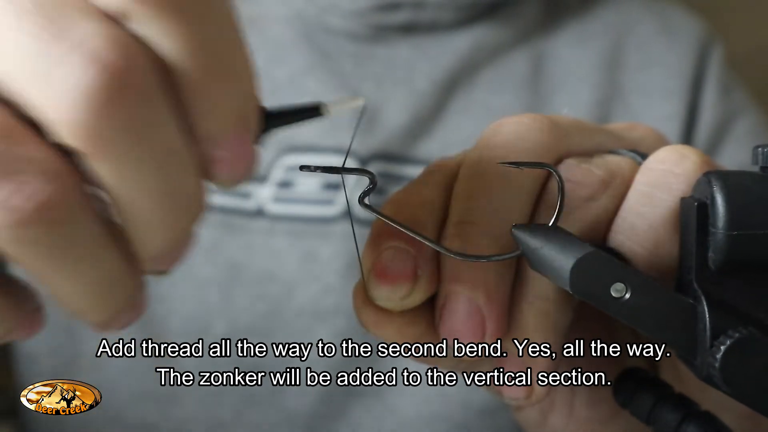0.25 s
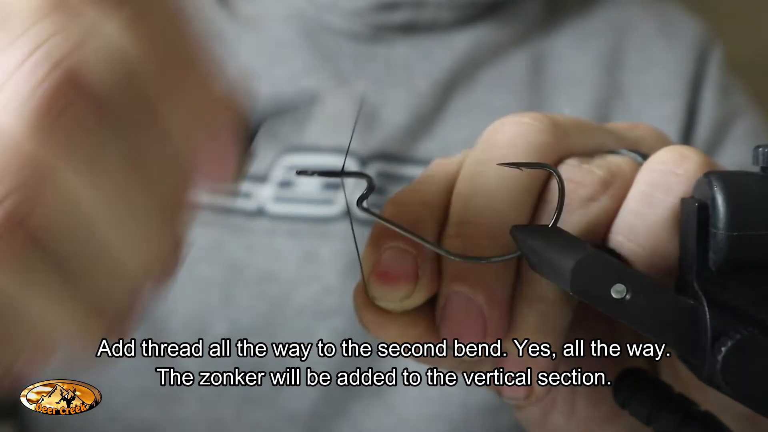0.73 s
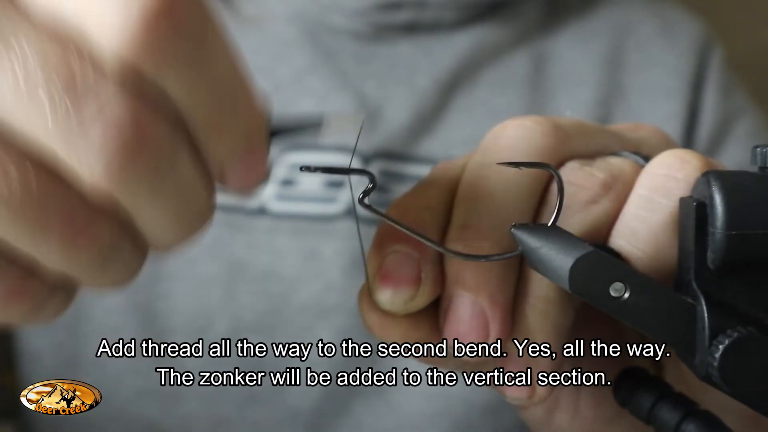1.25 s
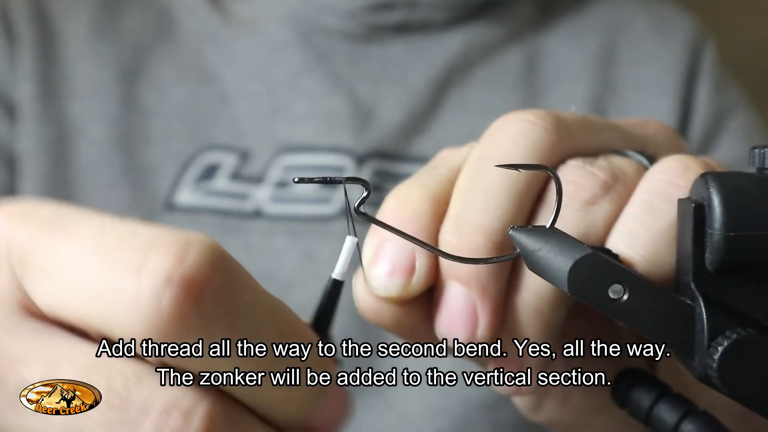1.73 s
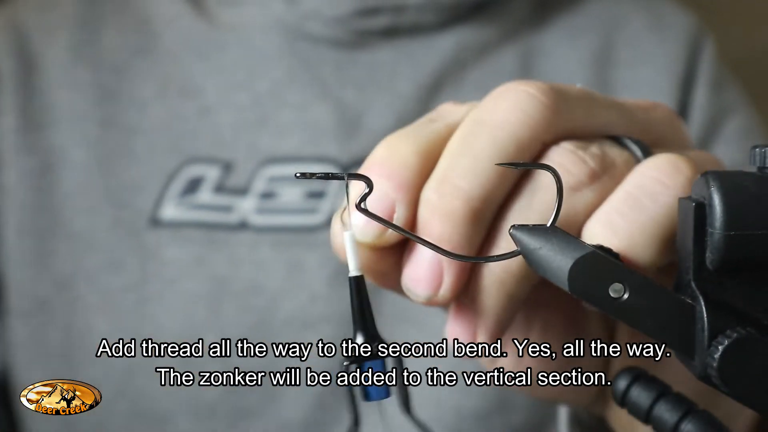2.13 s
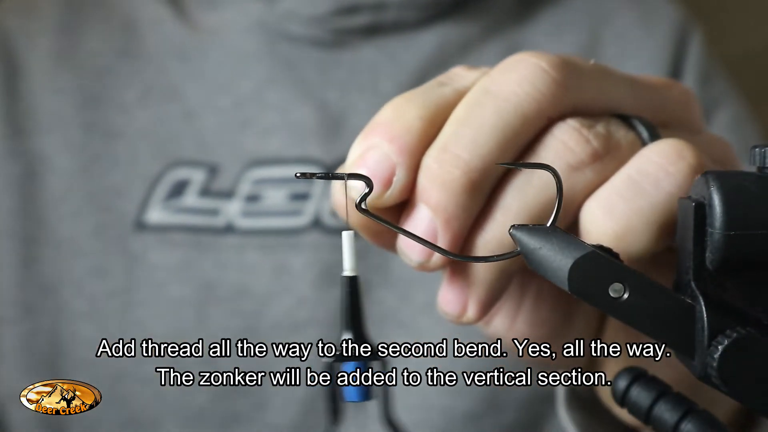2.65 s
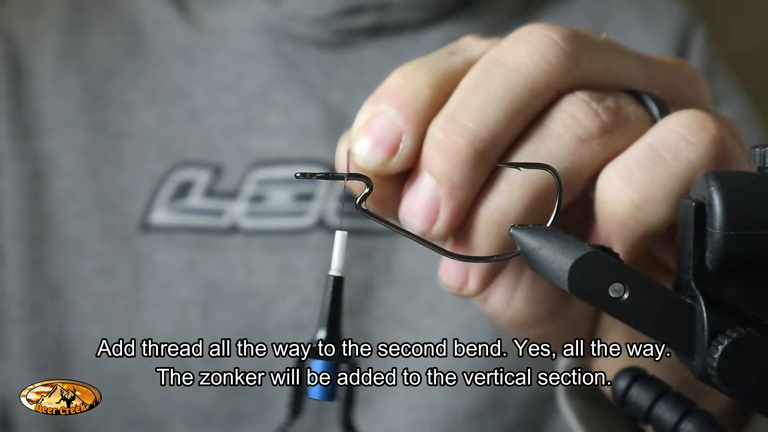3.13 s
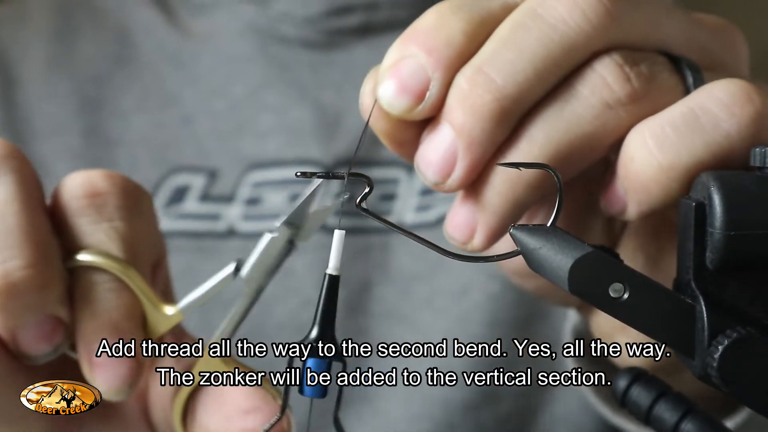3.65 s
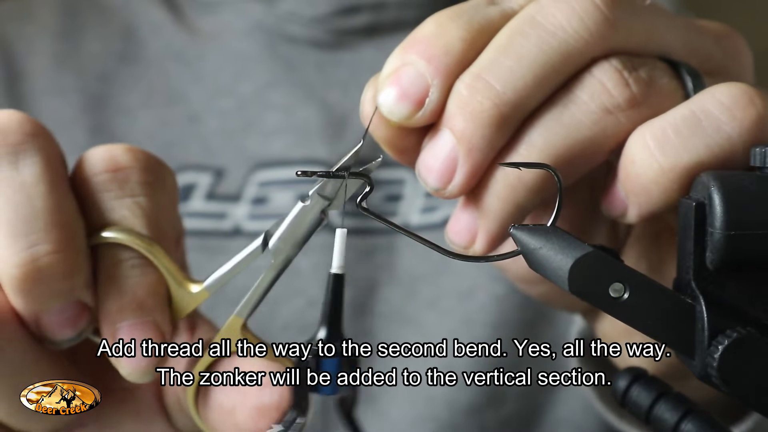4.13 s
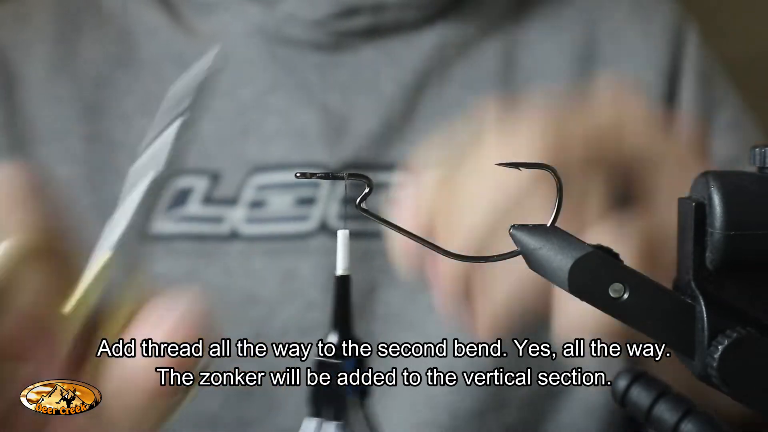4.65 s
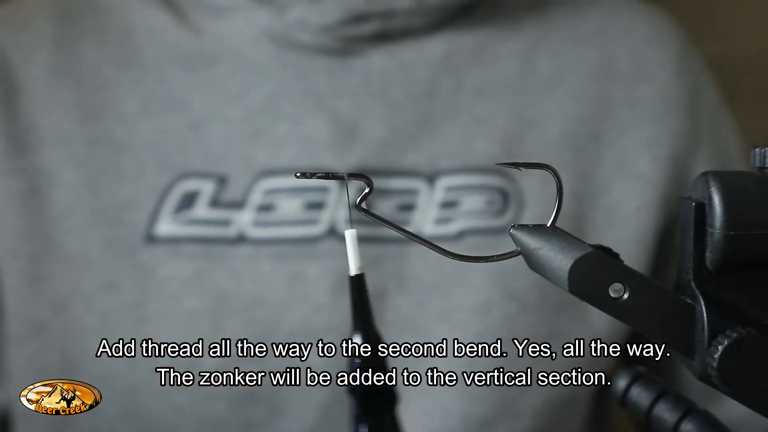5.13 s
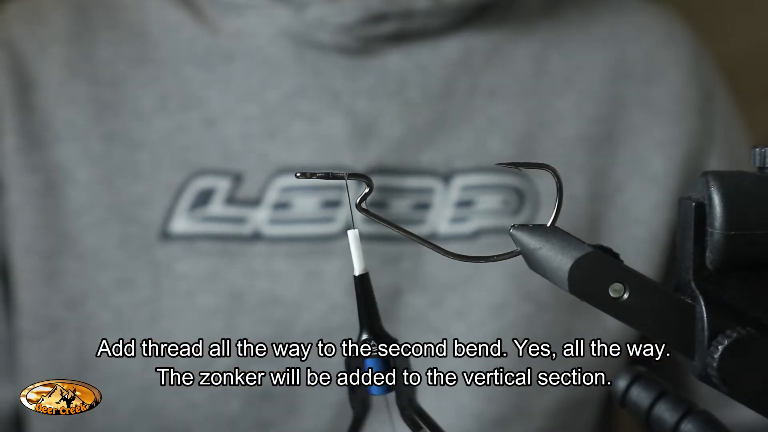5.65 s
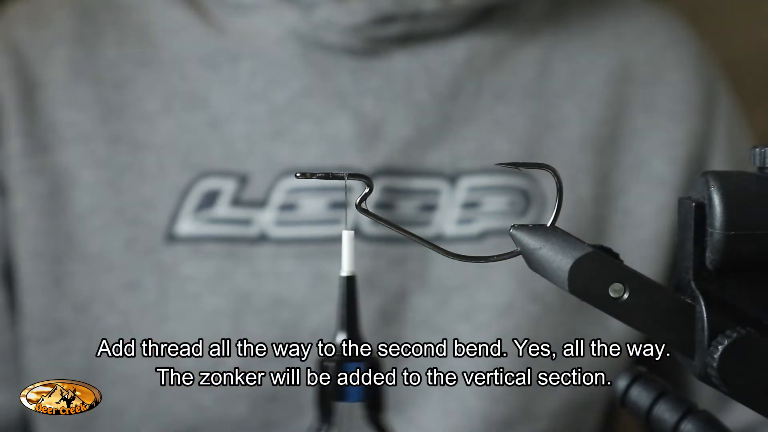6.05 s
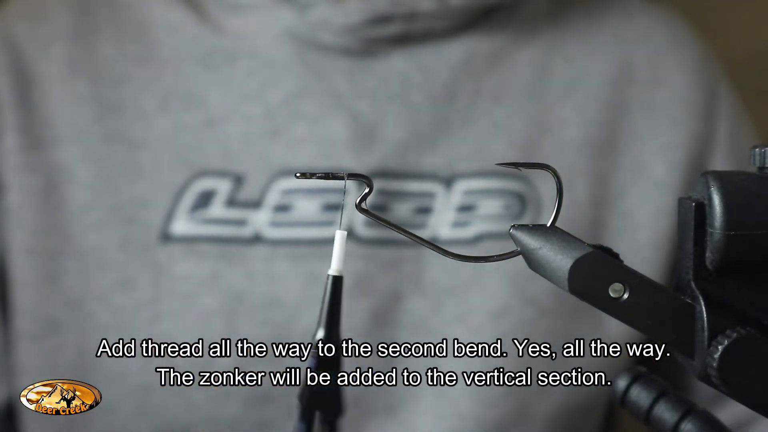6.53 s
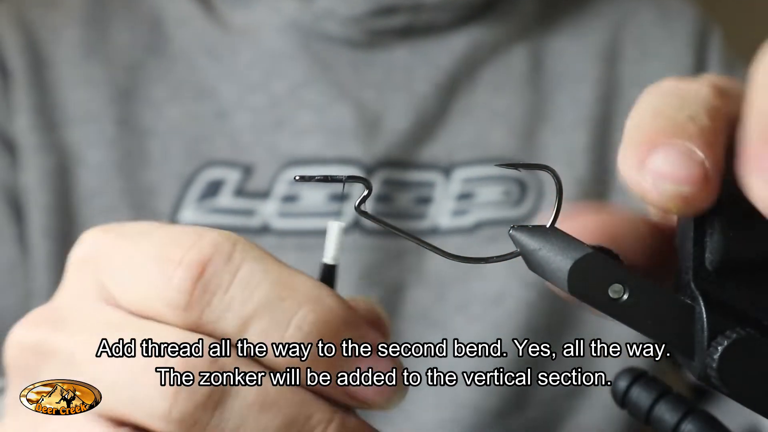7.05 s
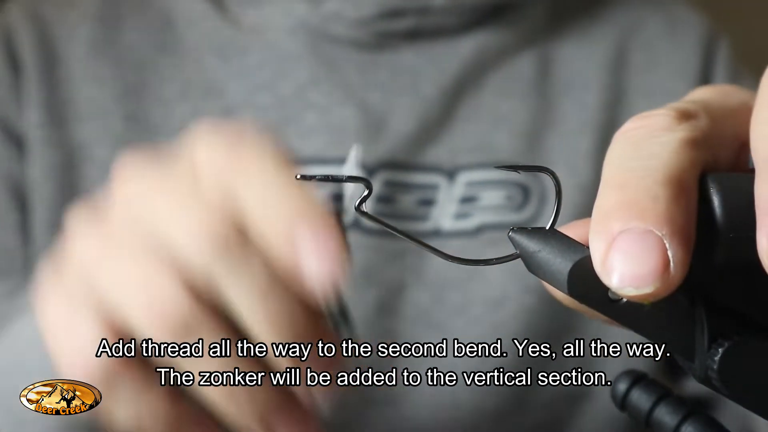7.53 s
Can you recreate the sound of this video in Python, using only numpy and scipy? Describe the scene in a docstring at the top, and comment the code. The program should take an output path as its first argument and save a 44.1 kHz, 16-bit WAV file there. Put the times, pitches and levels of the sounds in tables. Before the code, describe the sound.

Close stereo microphones in a small, dry room with steady soft hiss. A bobbin ticks lightly as thread is wound, and a sleeve brushes by. Scissors clatter brightly off a wooden desk, followed by a small hollow tock and a short, thin snip. After a pause, tools are put down with increasingly loud wooden knocks, the last hardest, while arms make the desk boom softly and thread ticks again.

```python
"""Fly-tying at a wooden desk

Close work at a vise in a small, dead room: a bobbin ticks as thread is wound, scissors clatter
off the desk, snip the thread and are put down with loud knocks. Each touch is a short burst of force that
drives decaying modes and a room tail; sleeves, tools and thread rub as shaped noise.
Arms leaning on the desk make it boom softly; microphones hiss and the gain ducks after the hardest knock."""
import sys
import numpy as np
from scipy import signal
from scipy.fft import rfft, irfft, next_fast_len
from scipy.io import wavfile
from scipy.ndimage import uniform_filter1d

SR = 44100
rng = np.random.default_rng(int(sys.argv[2]) if len(sys.argv) > 2 else 0)


def to_wav(s):
    """Save 16-bit WAV."""
    ch = np.atleast_2d(s).T  # columns
    pcm = np.round(np.clip(ch, -1, 1) * 32767)  # PCM
    wavfile.write(sys.argv[1], SR, pcm.astype(np.int16))


N = 343980
TIME = np.arange(N) / SR
RING_TIME = TIME[:SR * 3 // 4]
SWAY_HZ, PANEL_HZ = 63, 143.9   # the desk rocking, its top flexing

# left-right likeness of sound in the room: f/Hz, correlation
ROOM_LIKENESS = [(150, 1), (500, 0.97), (1200, 0.94), (2700, 0.77), (5000, -0.052), (9000, -0.81)]


def from_db(db):
    """Decibels to gain."""
    return 10 ** (np.asarray(db) / 20)


def rms_one(x):
    """Scale to rms 1."""
    return x / np.sqrt(np.mean(x ** 2) + 1e-20)


def energy_one(x):
    """Scale to unit energy per channel, averaged over the channels."""
    return rms_one(x) / np.sqrt(x.shape[-1])


def at_hz(points, hz):
    """Read a table on a log-frequency axis."""
    f, value = np.transpose(points)
    return np.interp(np.log(np.maximum(hz, 1)), np.log(f), value)


def coloured(x, spectrum):
    """Causal (minimum-phase) filter with the given spectrum."""
    size = 2 * next_fast_len(x.shape[-1] // 2 + 2048)
    gain = from_db(at_hz(spectrum, np.fft.rfftfreq(size, 1 / SR)))
    cepstrum = irfft(np.log(gain))
    # folding the cepstrum onto positive time makes the filter causal
    cepstrum[1:size // 2] *= 2
    cepstrum[size // 2 + 1:] = 0
    return irfft(rfft(x, size) * np.exp(rfft(cepstrum)))[..., :x.shape[-1]]


def evened(x, width_hz):
    """Level out chance humps and hollows of a spectrum that are wider than width_hz."""
    hz = np.fft.rfftfreq(x.shape[-1], 1 / SR)
    power = np.mean(np.abs(rfft(np.atleast_2d(x))) ** 2, axis=0)
    smooth = uniform_filter1d(power, max(int(width_hz / hz[1]), 1))
    inverse_db = -10 * np.log10(smooth / smooth.mean() + 1e-4)
    return coloured(x, np.c_[hz, inverse_db][1:])


def stereo_noise(likeness, size):
    """White noise whose two sides agree as the table says."""
    mid, side = rfft(rng.standard_normal((2, size)))
    alike = np.clip(at_hz(likeness, np.fft.rfftfreq(size, 1 / SR)), -1, 1)
    return irfft(np.sqrt(1 + alike) * mid + np.sqrt(1 - alike) * side * [[1], [-1]], size)


def room_tail():
    """Dense reflections: every octave dies at its own rate."""
    # room decay: f/Hz, t60/s
    decay_times = [(60, 0.11), (250, .27), (500, .15), (1200, 0.18), (3000, .18), (8000, 0.13),
                   (15000, 0.058)]
    size = len(RING_TIME)
    noise = rfft(stereo_noise(ROOM_LIKENESS, size))
    octave = np.round(np.log2(np.maximum(np.fft.rfftfreq(size, 1 / SR), 64)))
    tail = 0
    for k in np.unique(octave):
        decay = from_db(-60 * RING_TIME / at_hz(decay_times, 2 ** k))
        tail = tail + irfft(noise * (octave == k), size) * decay
    tail = coloured(evened(tail, width_hz=58), [(5000, 1.5), (12000, -0.5)])
    onset = 1 - np.exp(-RING_TIME / 0.000098)
    return energy_one(tail * onset)


def response(spectrum, modes, ring_db, room_db, left_lead):
    """One contact on a body: a crack, its modes and the room; the rms over 10 ms of its energy is 1."""
    samples = np.arange(len(RING_TIME))
    # left_lead: samples by which the left microphone hears it first
    crack = np.sinc(samples - 8 + np.array([[.5], [-.5]]) * left_lead)
    ring = 0
    for k, (hz, db, t60) in enumerate(modes):
        decay = from_db(db - 60 * RING_TIME / t60)
        ring = ring + (-1) ** k * decay * np.sin(2 * np.pi * hz * RING_TIME)
    # the ring reaches the two microphones as the crack does
    ring = signal.fftconvolve(crack[:, :32], ring[None], axes=1)[:, :len(ring)]
    body = energy_one(coloured(crack + from_db(room_db) * room_tail(), spectrum))
    return energy_one(body + from_db(ring_db) * energy_one(ring)) * np.sqrt(SR / 100)


def contact(rattle_s):
    """A first touch, then a dying rattle of tiny touches; a long rattle swamps the first touch."""
    t = TIME[:4096]
    hits = rng.random(len(t)) < 9000 / SR   # 9000 touches per second on average
    touches = hits * rng.choice([-.5, .5], len(t)) * np.exp(-t / max(rattle_s, 1e-4))
    touches[0] = 1
    return energy_one(evened(energy_one(touches), width_hz=490))


def pinged(x, hz, db):
    """Lift one resonance: the tool's own note, which depends on where it lands."""
    width_hz = 200
    b, a = signal.iirpeak(hz, hz / width_hz, fs=SR)
    return x + (from_db(db) - 1) * signal.lfilter(b, a, x)


def add(track, s, sound):
    """Mix a short sound in at time s."""
    start = round(s * SR)
    track[..., start:start + sound.shape[-1]] += sound[..., :N - start]


def played(force, body):
    """Drive a body with a force."""
    return signal.fftconvolve(force[None], body, axes=1)[:, :N]


def strokes(rows):
    """Force of a row of plain contacts, each with its own length of rasp."""
    force = np.zeros(N)
    for s, db, rasp_s in rows:
        add(force, s, from_db(db) * contact(rasp_s))
    return force


def struck(rows, spectrum, modes, ring_db, room_db, left_lead):
    """Blows on a body: heavy ones bring out bass, steel edges clack and sheen; each damps it differently."""
    mode_spread_db = 1.5   # each blow lands elsewhere and favours other modes
    out = np.zeros((2, N))
    for s, db, bass_db, clack_db, sheen_db, rattle_s, ping_hz, ping_db, ring_share in rows:
        hardness = [(170, bass_db), (650, 0), (1150, 0), (2300, clack_db), (3600, clack_db), (7000, sheen_db)]
        force = from_db(db) * pinged(coloured(contact(rattle_s), hardness), ping_hz, ping_db)
        stirred = []
        for hz, level_db, t60 in modes:
            stirred.append((hz, level_db + mode_spread_db * rng.standard_normal(), t60 * ring_share))
        body = response(spectrum, stirred, ring_db, room_db, left_lead)
        add(out, s, signal.fftconvolve(force[None], body, axes=1))
    return out


def swell(s, db, rise_s, hold_s, t60_s):
    """Gain of one movement: a smooth rise, a hold and an exponential release."""
    rise = np.sin(np.pi / 2 * np.clip((TIME - s) / max(rise_s, 1e-3), 0, 1)) ** 2
    return rise * from_db(db - 60 * np.clip((TIME - s - rise_s - hold_s) / t60_s, 0, 3))


def microphone_hiss():
    """Steady microphone hiss and room air: noise shaped in tone and in stereo width."""
    # tone: f/Hz, relative level/dB
    hiss_colour = [(15, -40), (25, -12), (59, -12), (148, -9.5), (227, -10), (445, -9.9), (567, -10.6),
                   (826, -13.3), (2120, -16.6), (4000, -23), (8580, -33), (11800, -42), (14000, -52),
                   (15500, -62)]
    # left-right likeness: f/Hz, correlation
    hiss_likeness = [(40, .97), (100, .6), (160, .1), (300, -.33), (550, -.53), (1000, -.56), (3000, -.52),
                     (8000, -.56), (12000, -.72)]
    return from_db(-49.9) * rms_one(coloured(stereo_noise(hiss_likeness, N), hiss_colour))


def shaken_mode(hz):
    """A low mode under many small random pushes; rms 1."""
    width_hz = 25.5
    band = signal.butter(2, [hz - width_hz / 2, hz + width_hz / 2], "band", fs=SR, output="sos")
    return rms_one(signal.sosfilt(band, rng.standard_normal(N + SR))[SR:])


def desk_tremble():
    """Hands working at the vise keep the desk's two low modes faintly astir."""
    # spells of work: t/s, level/dB, hold/s
    work = [(0, -50.5, 0.3), (.45, -55.5, 0.76), (1.05, -49.5, 0.47), (3.378, -61.5, 0.12),
            (3.79, -58, 0.79), (7.298, -54.5, 0.38)]
    rise_s, t60_s, panel_db = 0.012, 2.2, -10
    power = sum(swell(s, db, rise_s, hold_s, t60_s) ** 2 for s, db, hold_s in work)
    return power ** .5 * (shaken_mode(SWAY_HZ) + from_db(panel_db) * shaken_mode(PANEL_HZ))


def wandering_mode(hz, wander_hz):
    """A low mode under irregular pushes: its pitch wanders about the resonance."""
    wander = rms_one(uniform_filter1d(rng.standard_normal(N), size=900))
    return np.sqrt(2) * np.sin(2 * np.pi * np.cumsum(hz + wander_hz * wander) / SR)


def desk_boom():
    """Leaning arms rock the desk for as long as they press; its top thuds only as they land. After the hardest
    knock the desk rocks and thuds on briefly."""
    # an arm presses on the desk, or (6.542 s) the desk rocks on after the hardest knock: t/s, sway level/dB,
    # panel thud level/dB, rise/s, hold/s
    leans = [(1.949, -37, -45.5, 0.049, 0.012), (2.064, -48.5, -59, 0.086, .05),
             (2.749, -37, -41.5, 0.11, 0.043), (2.96, -48, -48, 0.027, .02), (4.076, -48, -68, 0.031, .01),
             (4.376, -32.5, -45, 0.068, 0.034), (5.526, -47, -43.5, 0.023, 0.057),
             (6.542, -37, -39, 0.024, .01), (7.025, -30, -37, 0.035, 0.1), (7.647, -43, -66, .06, 0.13)]
    sway_t60_s, panel_rise_s, panel_t60_s = 0.37, 0.023, 0.59
    coupling_db = -35   # share of the rocking that flexes the top
    sway = sum(swell(s, db, rise_s, hold_s, sway_t60_s) for s, db, _, rise_s, hold_s in leans)
    thuds = sum(swell(s, db, panel_rise_s, 0, panel_t60_s) for s, _, db, _, _ in leans)
    panel = thuds + from_db(coupling_db) * sway
    return sway * wandering_mode(SWAY_HZ, wander_hz=7.53) + panel * wandering_mode(PANEL_HZ, wander_hz=7.7)


def rubbing(pressure, spectrum, grain_db):
    """Friction noise, uneven as the surfaces catch and slip."""
    catches = rms_one(uniform_filter1d(rng.standard_normal(N), size=200))
    noise = stereo_noise(ROOM_LIKENESS, N) * from_db(grain_db * catches)
    return pressure * rms_one(coloured(noise, spectrum))


def crackle(pressure):
    """Single slips, and a dense run of tiny catches that swells with the brushing."""
    # slips of a brushing movement: t/s, level/dB, rasp/s
    slips = [(1.157, -38, 0.019), (2.650, -41, 0.017)]
    # what the catches set ringing: f/Hz, relative level/dB, t60/s
    catch_modes = [(2246, 1, 0.067), (2790, -2, 0.074), (3600, -1, 0.054), (4800, -9, .02)]
    # tone of a catch: f/Hz, relative level/dB
    catch_colour = [(200, -1), (1200, -15), (2400, -1), (4500, -7), (6000, -14), (9500, -11.5),
                    (12000, -20), (15500, -40)]
    catches_per_s, catch_db = 870, -2.5
    catches = rms_one(rng.choice([-1, 1], N) * (rng.random(N) < catches_per_s / SR))
    body = response(catch_colour, catch_modes, ring_db=-2.5, room_db=4.0, left_lead=-1.46)
    run = played(from_db(catch_db) * pressure * catches, energy_one(body))
    return played(strokes(slips), body) + run


def brushing_sleeves():
    """A sleeve or hand brushes along, catching at once and fading: soft noise with crackle."""
    # brushes: t/s, level/dB, hold/s
    brushes = [(1.138, -48, 0.062), (2.634, -43, 0.029), (6.157, -59, 0.054)]
    # tone: f/Hz, relative level/dB
    brush_colour = [(100, 3), (500, 1.5), (900, 3), (1400, 7), (2500, 8.5), (4000, -14), (6500, -5.5),
                    (9500, -20), (12000, -43), (15500, -48)]
    rise_s, t60_s = 0.021, 0.58
    pressure = sum(swell(s, db, rise_s, hold_s, t60_s) for s, db, hold_s in brushes)
    return rubbing(pressure, brush_colour, grain_db=2.5) + crackle(pressure)


def dragged_tools():
    """A tool dragged over the desk top gives a dull, low scrape that swells and fades."""
    # drags: t/s, level/dB, rise/s, hold/s, t60/s
    drags = [(2.702, -42, 0.049, 0.19, 0.41), (6.317, -35.5, .105, .01, 0.34)]
    # tone: f/Hz, relative level/dB
    drag_colour = [(40, 0.5), (150, 0), (300, 4), (500, 4.5), (900, -6.5), (1800, -15.5), (3500, -20),
                   (7000, -44), (15000, -45)]
    return rubbing(sum(swell(*row) for row in drags), drag_colour, grain_db=0.2)


def drawn_thread():
    """Thread is drawn once through the bobbin tube with a thin hiss of friction."""
    # tone: f/Hz, relative level/dB
    thread_colour = [(300, -2), (2000, -10), (2900, -16), (3600, -2), (4400, -15), (8000, -19),
                     (10500, -11), (13000, -32)]
    pull = swell(7.03, db=-54, rise_s=0.037, hold_s=0.074, t60_s=0.21)
    return rubbing(pull, thread_colour, grain_db=1.5)


def bobbin_ticks():
    """Taut thread slips on the hook and jerks the bobbin holder; its short note depends on the grip."""
    # ticks: t/s, level before tone/dB, brightness/dB, ping f/Hz, ping gain/dB
    ticks = [(0.2712, -48.5, -4, 1340, 8), (0.366, -43, 2, 2500, -0.5), (.3765, -56, -5, 560, 14),
             (0.497, -56, -6, 2100, 3), (0.786, -52.5, 4.5, 2500, -2), (.908, -50.5, -5, 1250, 1),
             (1.1181, -43.5, 4, 560, 4.5), (1.408, -41, -1.5, 2450, 1), (1.508, -45, 0.5, 1220, 9),
             (1.518, -41, -1, 520, 1), (1.531, -49, 0, 1230, 12), (7.641, -53, 7, 2400, 3),
             (7.715, -57, 6.5, 2400, -1)]
    # bobbin holder modes: f/Hz, relative level/dB, t60/s
    bobbin_modes = [(142.4, 4.5, 0.18), (560, -1.5, 0.084), (1255, 2, 0.027), (2184, 19.5, 0.014),
                    (2480, 4, 0.036), (2660, 13, 0.011)]
    # tone: f/Hz, relative level/dB
    bobbin_colour = [(50, -1), (150, 0), (600, 5.5), (950, -2), (1500, -1.5), (2500, 1.5), (3500, -6.5),
                     (5000, -18), (10000, -32), (15000, -34)]
    rasp_s = 0.00043
    force = np.zeros(N)
    for s, db, bright_db, ping_hz, ping_db in ticks:
        touch = coloured(contact(rasp_s), [(1500, 0), (2500, bright_db)])
        add(force, s, from_db(db) * pinged(touch, ping_hz, ping_db))
    return played(force, response(bobbin_colour, bobbin_modes, ring_db=-1.2, room_db=0.0, left_lead=-0.88))


def snip():
    """The blades rasp over each other and ring briefly; meeting the thread gives a lower bite."""
    # blades touching thread, cutting and closing: t/s, level before tone/dB, rasp/s, bite gain/dB
    snips = [(3.992, -64.5, 0.0009, 17), (4.332, -51, .004, -2), (4.3673, -48.5, 0.002, 0),
             (4.369, -47.5, .001, -4), (4.377, -52.5, 0.0013, 10), (4.3808, -46, 0.00089, -6)]
    # blade modes: f/Hz, relative level/dB, t60/s
    blade_modes = [(1850, 6.5, 0.012), (2270, 8.5, 0.011), (3060, 1, 0.012), (8130, -14, .15),
                   (9100, -3, .035), (10200, 1, .04), (12400, -14, .07)]
    # tone: f/Hz, relative level/dB
    blade_colour = [(200, 9), (1000, -12), (1850, 0), (3000, -5), (4500, -8), (7000, -3), (9600, 5),
                    (12000, -3), (15500, -11)]
    force = np.zeros(N)
    for s, db, rasp_s, bite_db in snips:
        add(force, s, from_db(db) * coloured(contact(rasp_s), [(3000, bite_db), (6000, 0)]))
    return played(force, response(blade_colour, blade_modes, ring_db=-4.5, room_db=3.0, left_lead=-1.2))


def tock():
    """One light, hollow touch after the clatter, with a short note from two modes."""
    # modes: f/Hz, relative level/dB, t60/s
    tock_modes = [(915, -5, 0.043), (2164, -22, 0.05)]
    # tone: f/Hz, relative level/dB
    tock_colour = [(200, -22), (900, 0), (1600, -2), (6000, -28)]
    force = strokes([(3.072, -43, .0003)])   # t/s, level/dB, rattle/s
    return played(force, response(tock_colour, tock_modes, ring_db=12, room_db=-11, left_lead=1.5))


def clatter():
    """The scissor handles stumble over the desk as they are picked up."""
    # blows: t/s, level before tone/dB, bass/dB, clack/dB, sheen/dB, rattle/s, ping f/Hz, ping gain/dB,
    # share of the ring time that the hand leaves
    blows = [(2.762, -38.5, 8.5, -10, -6, .001, 288, 10.5, .8),
             (2.802, -33.5, 3, -1.5, -5, .0008, 2620, 8.5, 0.94),
             (2.811, -34.5, 9.5, -2, -11, 0.0005, 850, 7, 0.96),
             (2.840, -28, 11.5, 5, 12, .0012, 2480, 9, .8), (2.844, -27, -1, 8.5, 16, 0.00083, 2620, -2, 1),
             (2.8485, -25.5, 1.5, 4.5, 4, 0.00052, 4000, 9, 0.89),
             (2.8555, -28.5, -1.5, -6, -3, 0.0012, 3900, 11, 0.59),
             (2.868, -38, 2, -12, 3, 0.00068, 380, 4, 0.61),
             (2.907, -32.5, 7, 0.5, 9, 0.00097, 2400, 9.5, 1),
             (2.924, -42, 11, -10, -5, 0.00075, 600, 3, .6),
             (2.9275, -24.5, -6, -5, 1, .0003, 1290, 3.5, 0.75),
             (2.933, -33.5, -12, -4, 5, .0006, 1700, 9, 0.79),
             (2.939, -31, -4, -7, -7, 0.00031, 900, 4, 0.89),
             (2.964, -31.5, -7, -5, -16, .0012, 970, 4.5, 0.77),
             (2.9715, -34, -4, 4, 2, 0.0025, 1580, 12.5, 1), (2.984, -34, 7, 1, -13, 0.0051, 720, -4, 1)]
    # handle modes: f/Hz, relative level/dB, undamped t60/s
    handle_modes = [(273, -0.5, 0.16), (380, 1, 0.11), (700, -13, .08), (900, 5.5, 0.068),
                    (1010, -8, 0.083), (1954, -2.5, 0.11), (2406, 0, 0.083), (2480, 3, 0.062),
                    (2624, -0.5, 0.11), (3430, -7, 0.09), (3590, -7, 0.093), (4000, -9, 0.05),
                    (4280, -3.5, 0.047)]
    # tone of the handles on the desk: f/Hz, relative level/dB
    handle_colour = [(40, -47), (100, 4), (145, 10.5), (200, -7), (300, -3), (600, 3.5), (950, 1.5),
                     (1500, -4), (2000, -9.5), (2500, -2.5), (3050, -8), (4100, -13), (5100, -23),
                     (6100, -23), (8500, -34.5), (11500, -48), (15000, -75)]
    return struck(blows, handle_colour, handle_modes, ring_db=-0.3, room_db=-1.0, left_lead=3.05)


def shank_scrapes():
    """Steel shanks scrape the desk and ring as they lift off."""
    # scrapes: t/s, level/dB, rasp/s
    lifts = [(2.972, -45, 0.0043), (2.985, -38.5, 0.0037), (2.992, -39.5, 0.0028)]
    # shank modes: f/Hz, relative level/dB, t60/s
    shank_modes = [(3370, 0, 0.061), (3490, 0, 0.13), (3640, -2, 0.15), (4230, -1, 0.07), (5600, -5, 0.054)]
    # tone: f/Hz, relative level/dB
    shank_colour = [(500, -24), (2500, 4), (3700, -2), (5000, -8), (8000, -30), (15000, -56)]
    return played(strokes(lifts), response(shank_colour, shank_modes, ring_db=5, room_db=1, left_lead=2.3))


def desk_knocks():
    """The desk top rings under each thing set down on it; the two microphones hear it unequally."""
    # knocks: t/s, level before tone/dB, bass/dB, clack/dB, sheen/dB, rattle/s, ping f/Hz, ping gain/dB,
    # share of the ring time that the hand leaves
    knocks = [(5.5425, -36.5, -1, 3.5, -5, 0.00079, 1510, 6, 0.44),
              (5.549, -48, -1, 11, 2, .0015, 3300, 5, 0.89), (5.629, -51, -6, 2, 12, .011, 1910, 16, .7),
              (5.7115, -47.5, 12, 4, -11, 0.0027, 1530, 11, 0.88),
              (6.0885, -18, 5, 1.5, 0, 0.00055, 1100, 4, 1),
              (6.096, -27, -11, 7, 21, 0.0042, 2570, 7, 0.52),
              (6.2587, -26, 3.5, -0.5, -5, 0.0014, 690, 8.5, 0.53),
              (6.2655, -28.5, 0, 3, -19, 0.00052, 560, 3.5, 0.42),
              (6.4317, -9, -1.5, 2, 6.5, 0.0009, 3600, -4, 0.71),
              (6.4331, -7.5, -0.5, -4.5, -1, 0.00017, 1310, 3, 1),
              (6.4381, -18, -8, 4.5, 4, 0.00049, 3200, 9, 0.35)]
    # desk top modes: f/Hz, relative level/dB, undamped t60/s
    desk_modes = [(66.8, -7, 0.58), (146.9, 6, 0.28), (206, -8, 0.19), (277, -3.5, 0.39), (394, -4.5, 0.36),
                  (420, -11, 0.12), (508, -3.5, 0.22), (612, 0, 0.19), (716, -4, 0.06), (806, -17, 0.15),
                  (920, -8, 0.16), (1007, 7, 0.1), (1250, 0.5, 0.03), (1350, -23, 0.16), (1480, -12, 0.081),
                  (1885, -11, 0.14), (2000, -22, 0.13), (2480, -1.5, 0.13), (2620, -3, .06),
                  (2860, -11.5, .065), (3232, 0, 0.024), (3330, 0, 0.07), (3600, -21, 0.097),
                  (4600, -13, 0.12)]
    # tone of a knock: f/Hz, relative level/dB
    desk_colour = [(30, -40), (60, -31), (100, -45), (150, -6.5), (210, 2.5), (320, 6), (550, 5.5),
                   (750, -2.5), (1250, -5), (1900, -10.5), (2700, -7.5), (4800, -17), (6500, -27),
                   (10000, -28), (15500, -40)]
    # microphone balance: f/Hz, left minus right/dB
    balance = [(700, 0.5), (1290, 1.5), (2380, -2.5), (4400, 1.5), (8120, 1.5), (15000, 0.5)]
    left, right = struck(knocks, desk_colour, desk_modes, ring_db=-1.5, room_db=0.0, left_lead=1.55)
    left = coloured(left, [(hz, .5 * db) for hz, db in balance])
    right = coloured(right, [(hz, -.5 * db) for hz, db in balance])
    return np.array([left, right])


def scene():
    """Tools, hands and desk over a steady hiss."""
    background = microphone_hiss() + desk_tremble() + desk_boom()
    friction = brushing_sleeves() + dragged_tools() + drawn_thread()
    tools = bobbin_ticks() + snip() + tock() + clatter() + shank_scrapes()
    return background + friction + tools + desk_knocks()


def gain_control(x, threshold_db, release_db_per_s):
    """Peaks over the threshold pull the gain down; it creeps back."""
    over = np.maximum(20 * np.log10(np.abs(x).max(axis=0) + 1e-9) - threshold_db, 0)
    creep = release_db_per_s * TIME
    held = np.maximum.accumulate(over + creep) - creep
    pole = np.exp(-1 / (0.0086 * SR))   # 8.6 ms smoothing
    return x * from_db(-signal.lfilter([1 - pole], [1, -pole], held))


def record(dry):
    """Gain control, overload at full scale and a steep top cut."""
    loud = np.clip(gain_control(dry, threshold_db=-1, release_db_per_s=7), -1, 1)
    cutoff_hz = 15200
    return signal.sosfilt(signal.ellip(10, .1, 80, cutoff_hz, fs=SR, output="sos"), loud)


dry = scene()
out = record(dry)
to_wav(out)
```